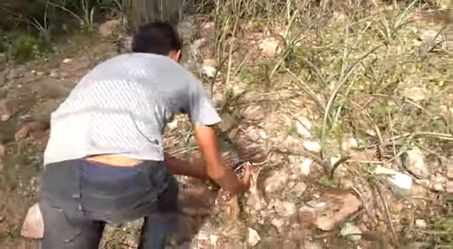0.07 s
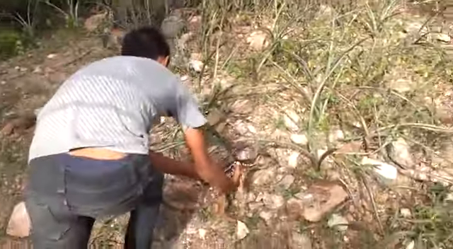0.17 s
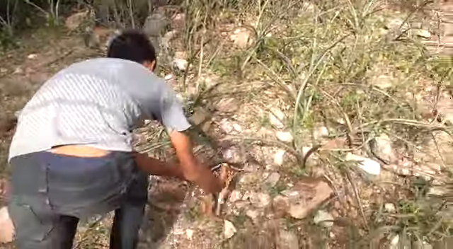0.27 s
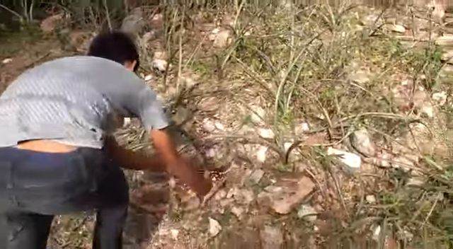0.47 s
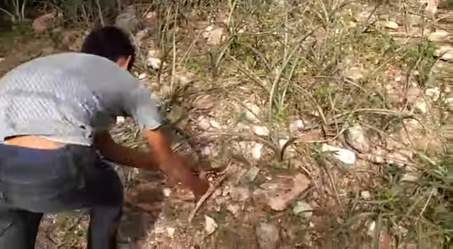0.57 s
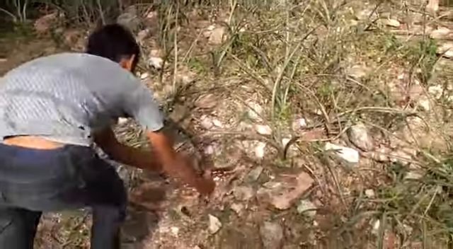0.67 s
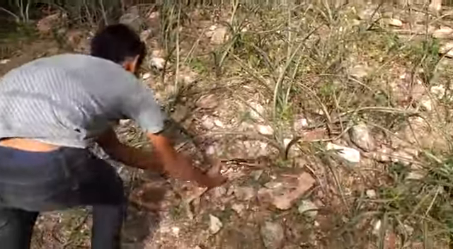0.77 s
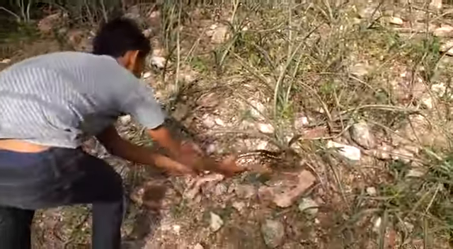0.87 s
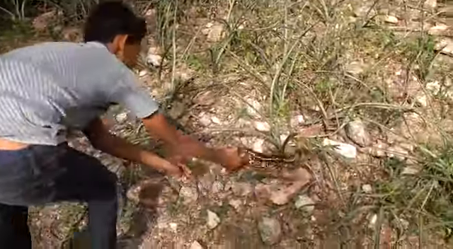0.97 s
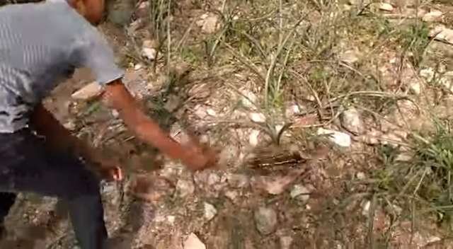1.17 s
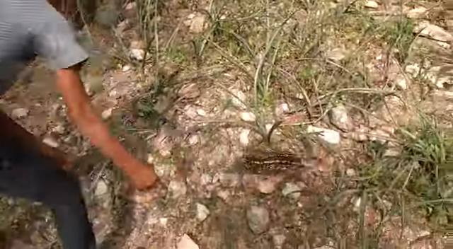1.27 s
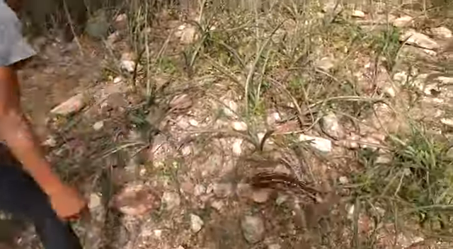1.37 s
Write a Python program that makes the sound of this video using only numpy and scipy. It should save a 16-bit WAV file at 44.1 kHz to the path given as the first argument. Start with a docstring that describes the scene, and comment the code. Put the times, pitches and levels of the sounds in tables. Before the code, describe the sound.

A small deer bleats once, loud and harsh, from about 0.2 to 0.7 seconds, swooping up, holding a high pitch, then dropping and breaking. Just before, a foot rustles and clacks stones, and wind buffets the microphone, fading by 0.4 seconds. From 1.0 to 1.4 seconds, soft steps rustle dry grass, stalks snap, stones knock and a sole scrapes, over a faint outdoor hiss.

```python
"""A small deer, set down by hand on a dry stony slope, gives one loud harsh bleat that swoops up, holds,
then drops and breaks: harmonics of its vocal folds, shaped by the resonances of its throat.
Feet shift on the loose ground: grass rustles, dry stalks snap, stones clack and a sole scrapes.
Air buffets the two microphone ports of a hand-held camera, over a faint distant hiss.
The slope returns a short echo."""
import sys
import numpy as np
from scipy import signal
from scipy.fft import rfft, irfft, next_fast_len
from scipy.io import wavfile
from scipy.ndimage import uniform_filter1d, map_coordinates

SR = 44100
rng = np.random.default_rng(int(sys.argv[2]) if len(sys.argv) > 2 else 0)


def persist_wave(psi):
    """Save psi, clipped to +-1, as 16-bit WAV."""
    counts = np.round(np.clip(psi, -1, 1) * 32767).astype(np.int16)
    wavfile.write(sys.argv[1], SR, np.atleast_2d(counts).T)


N = 61739
T = np.arange(N) / SR

# likeness of the noise at the two ports: (frequency [Hz], correlation [-1 to 1])
PORT_CORRELATION = [(110, -0.17), (260, 0.69), (1300, 1), (2100, -0.19)]


def amp(db):
    """Amplitude ratio of a level in decibels."""
    return 10 ** (np.asarray(db) / 20)


def unit(x):
    """Normalisation to rms 1."""
    return x / np.sqrt(np.mean(x ** 2) + 1e-20)


def along(points, hz):
    """Interpolation of (frequency [Hz], value) points on a logarithmic axis."""
    freqs, values = np.transpose(points)
    return np.interp(np.log(hz + 1), np.log(freqs + 1), values)


def curves(rows):
    """Linear interpolation in time: one curve for each column after the first."""
    times, *columns = np.transpose(rows)
    return [np.interp(T, times, column) for column in columns]


def wobble(rate):
    """Smooth random modulation: a spline through `rate` knots a second."""
    return map_coordinates(rng.standard_normal(4096), [T * rate], mode="wrap")


def filtered(x, response):
    """Linear filtering: the spectrum is multiplied by a frequency response."""
    size = next_fast_len(N + SR // 4)
    return irfft(rfft(x, size) * response(np.fft.rfftfreq(size, 1 / SR)), size)[..., :N]


def panned(db):
    """Left and right gains for a level difference."""
    return amp(np.array([db, -db]) / 2)


def coloured_noise(spectrum, correlation):
    """Stereo noise of rms 1; the balance of mid and side sets its correlation."""
    def response(hz):
        angle = np.arccos(np.clip(along(correlation, hz), -1, 1)) / 2
        return amp(along(spectrum, hz)) * [np.cos(angle), np.sin(angle)]
    mid, side = filtered(rng.standard_normal((2, N)), response)
    return unit(np.array([mid + side, mid - side]))


def band(centre_hz, octaves):
    """Band-pass stereo noise of rms 1, halved in amplitude `octaves` from the centre."""
    bell = lambda hz: 1 / (1 + (np.log2((hz + 1) / centre_hz) / octaves) ** 2)
    return unit(filtered(rng.standard_normal((2, N)), bell))


def strike(onset, attack_s, t60_s):
    """Impact envelope: a fast rise and an exponential decay."""
    age = np.maximum(T - onset, 0)
    return (1 - np.exp(-age / attack_s)) * amp(-60 * age / t60_s)


def pushes(rows, attack_s, t60_s):
    """Heavily damped sinusoids that swing once or twice and die."""
    return sum(amp(db) * strike(onset, attack_s, t60_s) * np.sin(2 * np.pi * hz * (T - onset))
               for onset, db, hz in rows)


def swells(rows):
    """Noise bands under Gaussian envelopes."""
    return sum(amp(db) * np.exp(-((T - time) / half_s) ** 2) * band(hz, octaves)
               for time, db, half_s, hz, octaves in rows)


def buffeting():
    """Moving air drives the two ports in antiphase; each jolt reaches the right one just later."""
    # strength of the buffeting: (time [s], level [dB])
    levels = [(0, -25.5), (.09, -36), (.13, -27.5), (.22, -35.5), (.33, -45.5), (.72, -48.5), (.85, -66.5),
              (1.18, -48.5), (1.4, -61)]
    # its rumble: (frequency [Hz], level [dB])
    spectrum = [(25, -20), (50, -1), (100, 1.5), (300, -29.5), (800, -68.5)]
    # jolts of air: (time [s], level [dB], frequency [Hz])
    jolts = [(.0, -8, 89.5), (.064, -9.5, 85), (.1625, -1, 115.5), (.356, -22, 158), (.418, -30, 172.2)]
    lag_s = 0.00042
    level_db, = curves(levels)
    left = pushes(jolts, attack_s=0.0023, t60_s=0.042)
    right = -np.interp(T - lag_s, T, left)
    return amp(level_db) * coloured_noise(spectrum, correlation=[(50, -0.95)]) + np.array([left, right])


def rustle():
    """Dry grass and grit underfoot: random amplitude modulation breaks noise into clumps of grains."""
    # strength of the rustle: (time [s], level [dB])
    levels = [(0, -38.5), (.06, -43), (.098, -41.5), (.128, -33.5), (.16, -46.5), (.26, -42.5), (.31, -64),
              (.74, -66), (.95, -64.5), (1.0, -53), (1.035, -58), (1.07, -49.5), (1.125, -54), (1.14, -42),
              (1.18, -51), (1.222, -56.5), (1.245, -42.5), (1.28, -42.5), (1.338, -40.5), (1.358, -45.5),
              (1.4, -45.5)]
    # colour of the grass: (frequency [Hz], level [dB])
    spectrum = [(60, -12), (250, 7.5), (550, 5.5), (1600, 6), (2200, -0.5), (2700, 1.5), (4500, 0.5),
                (6200, 0), (7600, -12), (9000, -4), (11000, -13), (15500, -10)]
    grain_db, clump_db = 3.5, 1.8
    level_db, = curves(levels)
    grains = amp(grain_db * wobble(rate=390) + clump_db * wobble(rate=70))
    return amp(level_db) * unit(grains * coloured_noise(spectrum, PORT_CORRELATION))


def distant_hiss():
    """Ambient noise: steady, faint and broadband."""
    # colour of the hiss: (frequency [Hz], level [dB])
    spectrum = [(40, 16), (800, 9), (3000, 3), (5000, 11), (8000, 1), (15500, 4.5)]
    return amp(-58.5) * coloured_noise(spectrum, PORT_CORRELATION)


def snaps():
    """Brittle fracture: each dry stalk breaks with a sharp burst of bright noise."""
    # breaking stalks: (time [s], level [dB], centre [Hz], T60 [s])
    fractures = [(0.017, -34, 7000, 0.042), (0.9785, -33.5, 5200, 0.017), (1.043, -46.5, 5100, 0.11),
                 (1.1327, -41, 11200, 0.19), (1.2598, -27, 10200, 0.031), (1.293, -30.5, 4440, 0.02),
                 (1.3502, -16, 6850, 0.0089)]
    return sum(amp(db) * strike(onset, attack_s=0.0003, t60_s=t60) * band(hz, octaves=0.75)
               for onset, db, hz, t60 in fractures)


def stones():
    """Modal vibration: each impact rings a few damped modes of a stone, with a crack of noise."""
    # stones knocking together: (time [s], level [dB], pitch [Hz])
    impacts = [(.101, -25, 1690), (0.119, -27.5, 2980), (0.1254, -36, 2165), (1.2423, -32.5, 1464),
               (1.256, -30, 1700), (1.269, -35, 1620), (1.2932, -22, 1574), (1.365, -29.5, 1735)]
    # modes of a stone: (frequency / pitch [ratio], level [dB])
    modes = [(.76, -6), (1, 0), (1.27, -9), (2.3, -13)]
    crack_spectrum = [(200, -18), (2000, 26), (5000, -63), (15000, -35)]  # (frequency [Hz], level [dB])
    clacks = np.zeros((2, N))
    for onset, db, hz in impacts:
        ring = np.zeros((2, N))
        for ratio, mode_db in modes:
            gain = amp(mode_db + rng.normal(0, 1.8))
            ring += gain * np.sin(2 * np.pi * hz * ratio * (T - onset) + rng.normal(0, 1.0, (2, 1)))
        crack = amp(-10) * coloured_noise(crack_spectrum, PORT_CORRELATION)
        clacks += amp(db) * strike(onset, attack_s=0.0006, t60_s=0.02) * (ring + crack)
    return clacks


def footfalls():
    """Damped impact: each soft step gives a low thud."""
    # steps: (time [s], level [dB], frequency [Hz])
    steps = [(.129, -17, 273), (.695, -36.5, 300), (1.07, -41, 176.8), (1.136, -32, 257),
             (1.242, -36.5, 259), (1.291, -34, 242)]
    return pushes(steps, attack_s=0.0015, t60_s=0.032)


def bleat(harmonics=17):
    """Source and filter: vocal-fold harmonics, rough at both ends, pass three moving throat formants."""
    # vibration of the folds: (time [s], pitch [Hz])
    melody = [(.18,709),(.21,672.7),(.228,722),(.242,795),(.254,791),(.268,858),(.285,868),(.352,898.6),(.385,894.7),(.42,860.5),(.475,854.8),(.538,891.6),(.62,863.8),(.65,845.4),(.672,818.6),(.688,772),(.699,720),(.708,598),(.72,513.4),(.74,494)]
    # first harmonic: (time [s], level [dB])
    fundamental = [(.17, -48.5), (.243, -33.5), (.42, -51.5), (.7, -54), (.74, -59)]
    # top overtones: (time [s], level [dB])
    overtones = [(.23, -73), (.262, -30), (.32, -38), (.379, -35.5), (.5, -45), (.62, -47), (.7, -52.5)]
    # their envelope: (frequency [Hz], level [dB])
    top_spectrum = [(7060, -4.5), (8000, -14.5), (8600, -5), (10700, -16), (12300, -21.5), (15500, -25)]
    # unsteadiness of the folds: (time [s], jitter [thousandths of a cycle], relative rasp [dB])
    roughness = [(.2, 5, -22), (.263, 8, -9), (.315, .2, -42), (.64, .2, -60), (.69, 2.5, -19),
                 (.706, 7, -8)]
    # lower, middle and shrill upper throat resonances: (time [s], level [dB], centre [Hz])
    low_formant = [(0.17, -34.5, 1860), (0.23, -22.5, 1890), (0.242, -11, 2000), (0.271, -6, 2076),
                   (0.34, -13, 2093), (0.399, -15, 2120), (0.5, -12.5, 2177), (0.64, -19, 2370),
                   (0.695, -17.5, 2232), (0.718, -18, 2176), (0.734, -41.5, 2305)]
    mid_formant = [(0.227, -83, 4060), (0.244, -32.5, 3900), (0.29, -29, 4530), (0.312, -30.5, 5160),
                   (0.349, -24.5, 4860), (0.401, -27, 3824), (0.422, -43, 4100.0), (0.52, -33.5, 4380),
                   (0.604, -28.5, 3725), (0.688, -28, 4600.0), (0.718, -34.5, 4640), (0.734, -54, 4160.0)]
    high_formant = [(0.23, -94, 5950), (0.245, -28, 6330), (0.284, -41.5, 5600), (0.307, -17.5, 6470),
                    (0.342, -18.5, 6550), (0.362, -32.5, 5870), (0.386, -11, 5770), (0.408, -21.5, 5750),
                    (0.427, -17, 6080), (0.475, -13.5, 5860), (0.494, -13.5, 5725), (0.533, -10.5, 5746),
                    (0.586, -17, 5600), (0.63, -15, 5550), (0.67, -34, 5660), (0.697, -23, 5520),
                    (0.716, -24.5, 5740), (0.729, -56, 6000)]
    # their shapes, low to high: (bandwidth [Hz], reach of the skirts [Hz])
    widths = [(129.4, 2160), (786, 4100), (412, 996)]
    # level difference at the ports: (frequency [Hz], left minus right [dB])
    balance = [(800, 1), (2000, -10.5), (2650, 1.5), (4400, 5), (6000, -3.5), (8800, 3.5), (15000, -18.5)]
    # phase difference at the ports: (frequency [Hz], left lead [rad])
    phase_lead = [(1800, 0.2), (2200, 4), (2700, 3.5), (3400, 0.9), (4400, 5), (5200, 4.5), (6350, 6),
                  (9400, 13.5), (16000, 30)]
    shrill_hz, flutter_db, steady_db = 6000, 5, -29

    pitch, = curves(melody)
    fundamental_db, = curves(fundamental)
    top_db, = curves(overtones)
    jitter, rasp_db = curves(roughness)
    formants = [curves(low_formant), curves(mid_formant), curves(high_formant)]
    pitch = uniform_filter1d(pitch, size=300) * (1 + 0.0012 * wobble(rate=70))
    cycles = np.cumsum(pitch) / SR + jitter * wobble(rate=890) / 1000
    voice = np.zeros((2, N))
    for k in range(1, harmonics + 1):
        hz = k * pitch
        power = amp(top_db + along(top_spectrum, hz)) ** 2
        for (db, centre), (width, reach) in zip(formants, widths):
            peak = amp(db) ** 2 / (1 + (2 * (hz - centre) / width) ** 2)
            power += peak * np.exp(-2 * ((hz - centre) / reach) ** 2)
        gain = amp(fundamental_db) if k == 1 else np.sqrt(power)
        # each harmonic wavers on its own, most when weaker than steady_db and near shrill_hz
        shrillness = np.minimum(hz / shrill_hz, 2)
        depth_db = flutter_db * np.minimum(np.sqrt(shrillness), 1 / shrillness)
        depth_db /= 1 + gain / amp(steady_db)
        drift = wobble(rate=36)
        flutter = 0.81 * np.array([wobble(rate=110), wobble(rate=110)])
        waver = amp(depth_db * (drift + flutter) - np.abs(depth_db) / 4)
        # fast modulation spreads noisy sidebands around the harmonic
        rasp = 1 + amp(rasp_db) * shrillness * (wobble(rate=2100) + 1j * wobble(rate=2100))
        lead = along(phase_lead, hz) / 2
        phase = 2 * np.pi * k * cycles + np.array([lead, -lead])
        voice += gain * waver * panned(along(balance, hz)) * np.real(rasp * np.exp(1j * phase))
    sounding = (T > low_formant[0][0]) & (T < fundamental[-1][0])
    return np.sqrt(2) * voice * sounding


def breath():
    """Aspiration noise: air hisses through the deer's throat as the cry closes."""
    # hiss: (time [s], level [dB], half length [s], centre [Hz], half width [octaves])
    hisses = [(0.729, -43, 0.037, 6400, 5.3)]
    return swells(hisses)


def scrape():
    """Friction noise: a sole slides briefly over grit."""
    # slide: (time [s], level [dB], half length [s], centre [Hz], half width [octaves])
    slides = [(1.336, -31.5, 0.012, 6500, 1)]
    return swells(slides)


def slope_echo(x, t60_s=0.085, build_s=0.0074):
    """Scattering off stones and plants: convolution with a short diffuse tail."""
    t = np.arange(SR // 3) / SR
    tail = rng.standard_normal((2, len(t))) * amp(-60 * t / t60_s) * (1 - np.exp(-t / build_s))
    return signal.fftconvolve(x, tail / np.linalg.norm(tail[0]), axes=1)[:, :N]


def lean(x):
    """A level difference between the ports places each frequency to the left or right."""
    # balance of the noises: (frequency [Hz], left minus right [dB])
    balance = [(300, 1.5), (1500, -3), (6000, 0), (15000, -7.5)]
    return filtered(x, lambda hz: panned(along(balance, hz)))


def scene():
    """Superposition of the voice and ground noises, their echo, the footfalls and the air."""
    near = bleat() + lean(breath() + scrape() + stones() + snaps() + rustle())
    air = lean(distant_hiss())
    return near + amp(-22) * slope_echo(near) + footfalls() + buffeting() + air


def record(dry):
    """Band limiting: the camera's steep low-pass removes the highest treble."""
    cutoff_hz = 15650
    return filtered(dry, lambda hz: 1 / np.sqrt(1 + (hz / cutoff_hz) ** 200))


dry = scene()
out = record(dry)
persist_wave(out)
```